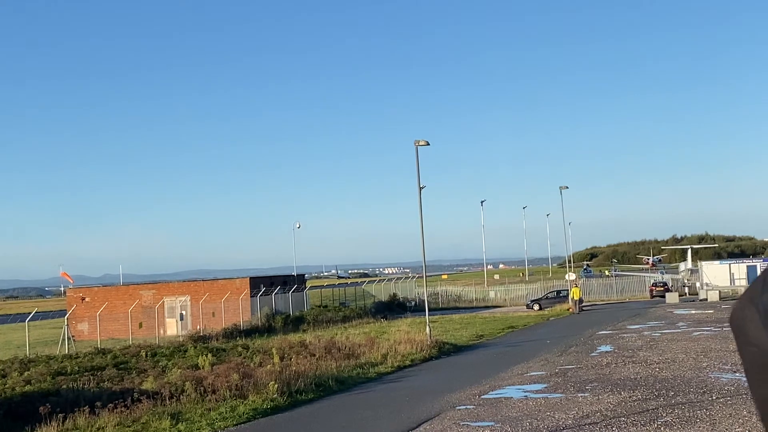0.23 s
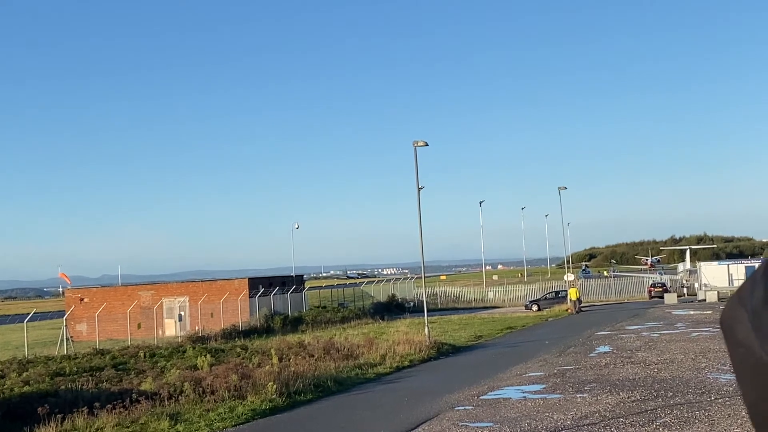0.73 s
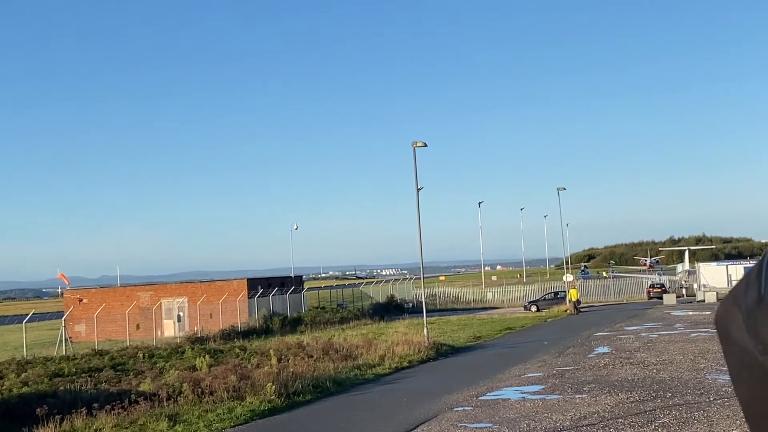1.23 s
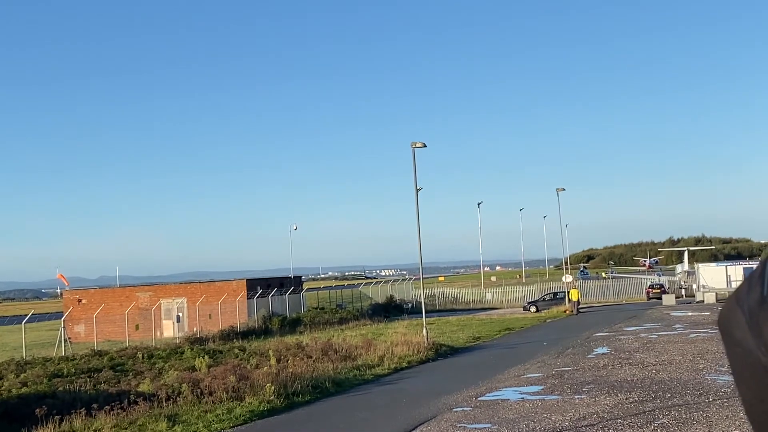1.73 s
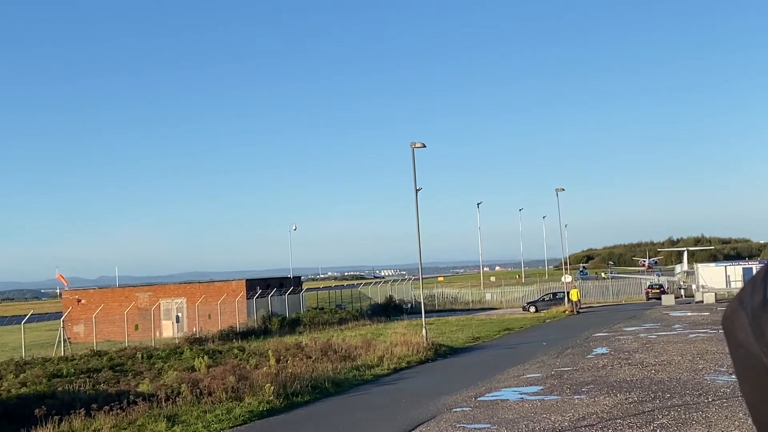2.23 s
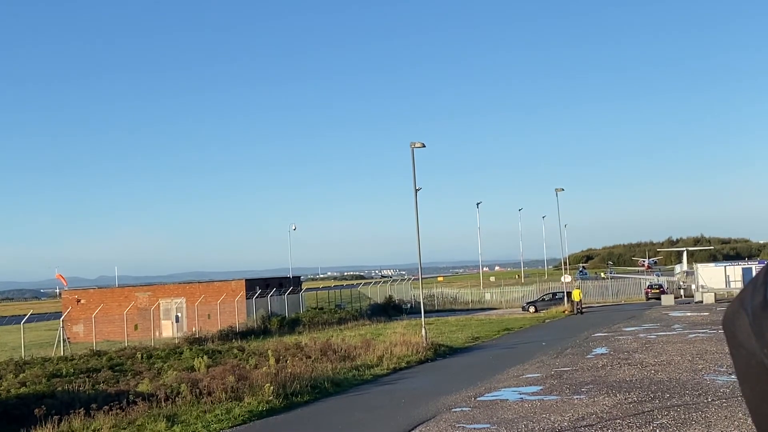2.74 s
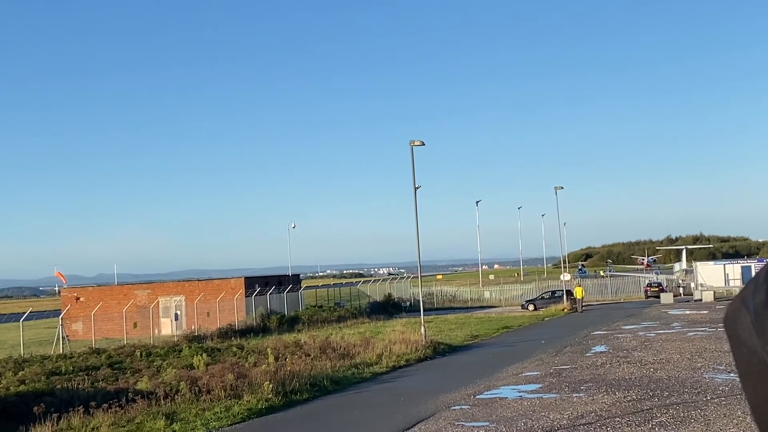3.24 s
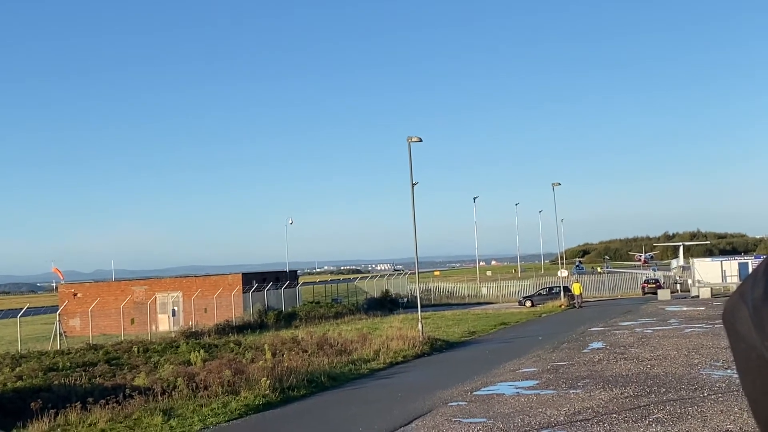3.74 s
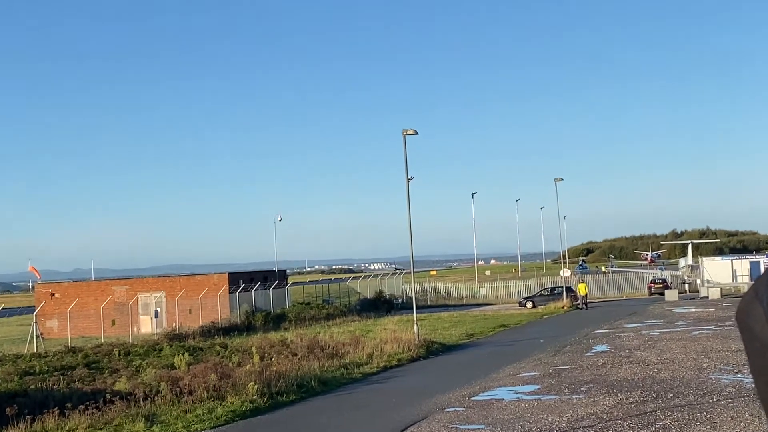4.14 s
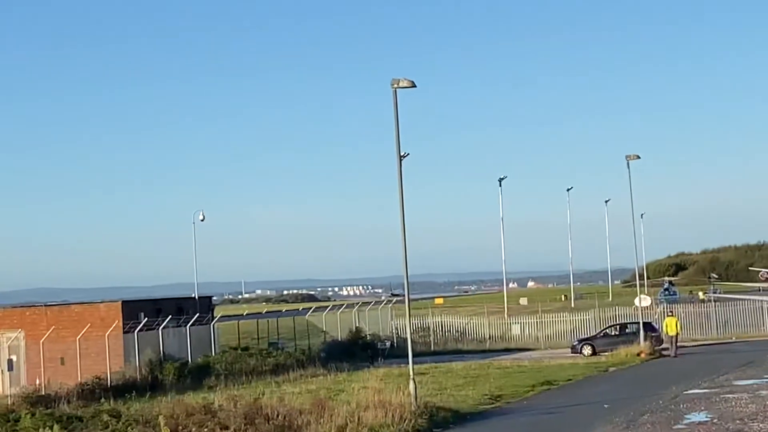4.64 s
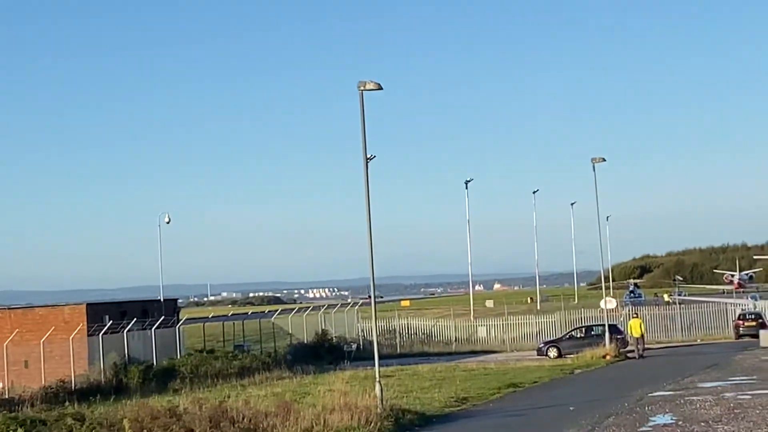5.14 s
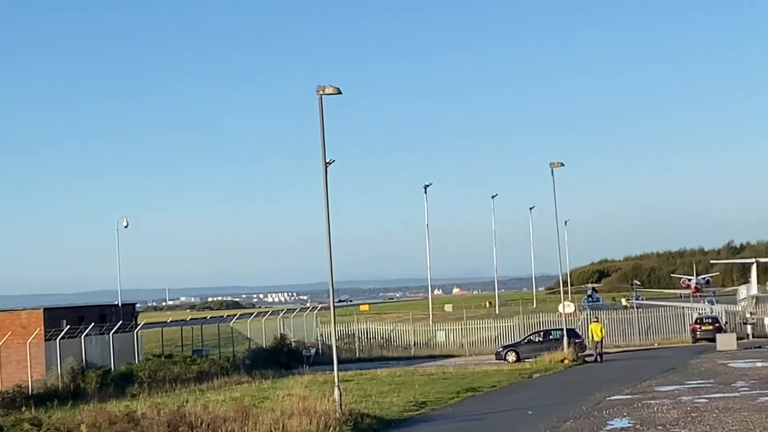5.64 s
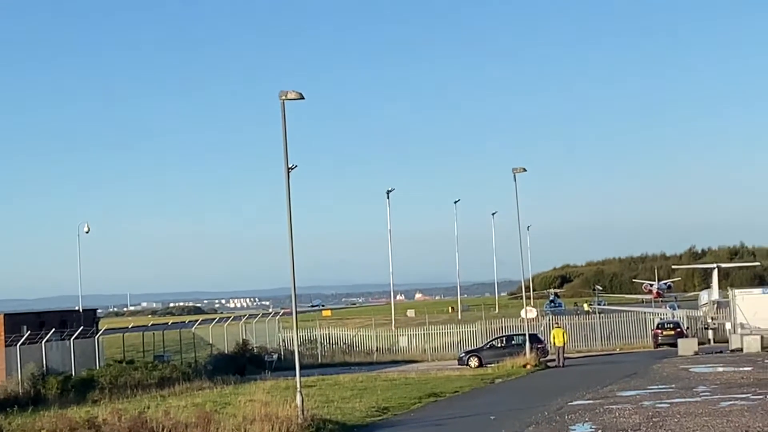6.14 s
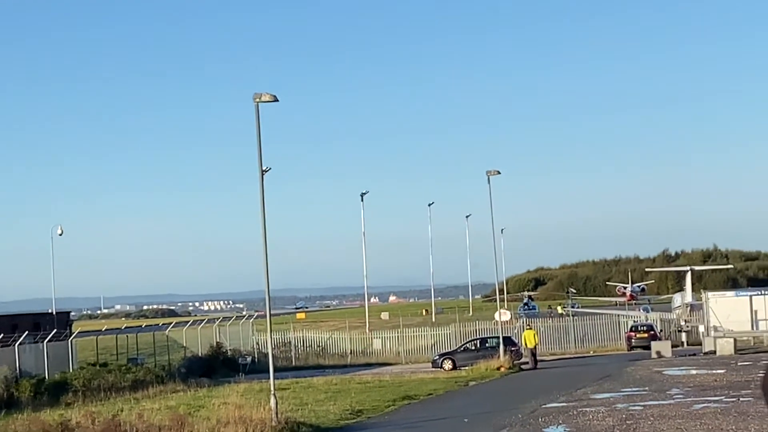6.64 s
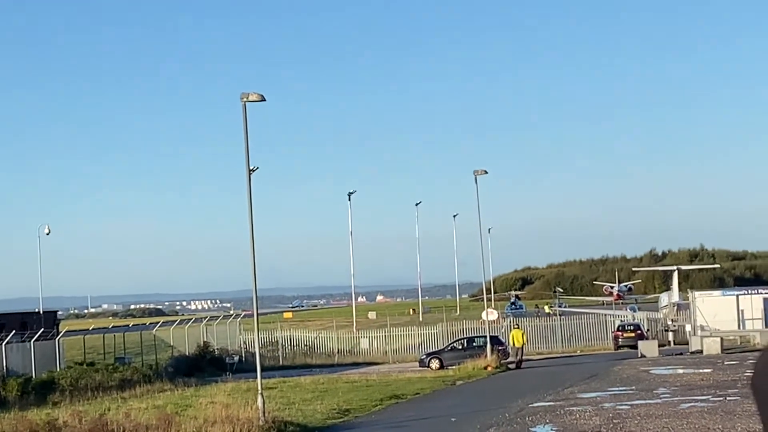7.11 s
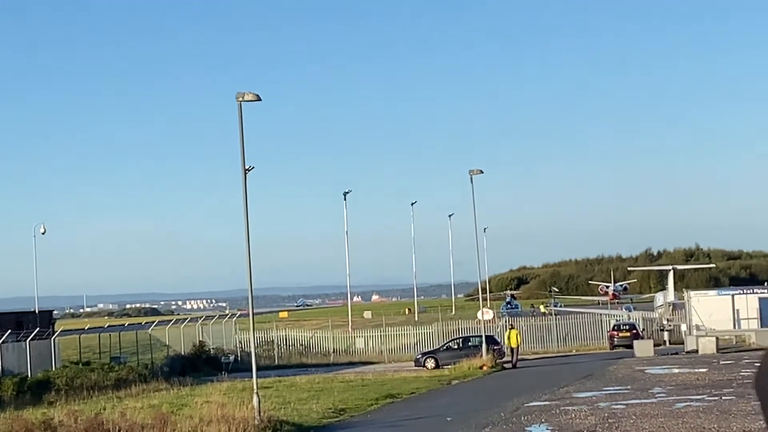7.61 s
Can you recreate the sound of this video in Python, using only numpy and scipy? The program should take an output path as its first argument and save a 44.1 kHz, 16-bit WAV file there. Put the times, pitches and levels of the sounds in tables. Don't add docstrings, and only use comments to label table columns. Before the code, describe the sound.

A continuous deep jet rumble fills the whole 7.9 seconds, already under way at the start, with slow booming pulses, strongest near 0.5 s and again around 1.8 and 4.7 s. Above it lies a broad turbulent roar, fullest around 2.8 s, then hazier and duller from about 4.5 s, fading slightly at the end. A faint blurred whine near 900 Hz sinks slowly. Small birds sing quietly on top: a rapid row of chips at 0.5-0.6 s, thin high whistles at 0.8-1.4, a louder cluster and warble at 1.5-2, stepped falling notes at 2.6-2.9, cheeps, swoops and steep falls at 4-5, distant buzzing falls near 5.8-6.1, and a last tumbling whistle at 7.7. Light echoes surround them. Soft low wind presses on the hand-held phone, with tiny finger ticks near 4, 4.25 and 7-7.3 s over faint hiss.

```python
import sys
import numpy as np
from scipy import signal
from scipy.fft import rfft, irfft, next_fast_len
from scipy.io import wavfile
from scipy.ndimage import uniform_filter1d

SR = 44100
rng = np.random.default_rng(int(sys.argv[2]) if len(sys.argv) > 2 else 0)


def amplitude_ratio(level_db):
    exponent = np.asarray(level_db, float) / 20
    return 10 ** exponent


def put_to_file(sound):
    columns = np.atleast_2d(sound).T
    safe = np.clip(columns, -1, 1)
    whole_steps = np.round(safe * 32767)
    wavfile.write(sys.argv[1], SR, whole_steps.astype(np.int16))


N = 347067
HZ = np.fft.rfftfreq(2048, 1 / SR)
T = np.arange(N // 512 + 5) * 512 / SR


def evened(x):
    return x / np.sqrt(np.mean(x ** 2) + 1e-20)


def read(points, hz):
    f, value = np.transpose(points)
    return np.interp(np.log(hz + 1), np.log(f + 1), value)


def control(table, index, t):
    rows = np.array(table)
    return np.interp(t, rows[:, 0], rows[:, index])


def add(mix, s, sound):
    part = mix[round(s * SR):][:len(sound)]
    part += sound[:len(part)]


def coloured(points, channels):
    size = next_fast_len(N)
    white = rfft(rng.standard_normal((channels, size)))
    gain = amplitude_ratio(read(points, np.fft.rfftfreq(size, 1 / SR)))
    return evened(irfft(white * gain, size)[:, :N])


def noise(field_db, same, patchy_db, side_db=0):
    a, b, c, d, patches = rng.standard_normal((len(T), len(HZ), 5)).T
    patches = evened(uniform_filter1d(uniform_filter1d(patches, 7, 0), 34, 1))
    same = np.clip(same, -1, 1)
    mid = np.sqrt((1 + same) / 2) * (a + 1j * b)
    side = np.sqrt((1 - same) / 2) * (c + 1j * d) * amplitude_ratio(side_db)
    z = np.array([mid + side, mid - side]) * amplitude_ratio(field_db + patchy_db * patches)
    return evened(signal.istft(z, nperseg=2048, noverlap=1536)[1][:, :N])


def air_pushes(rows, t60, rise_s, trim_db):
    out, t = np.zeros(N), np.arange(SR // 2) / SR
    for s, db, hz in rows:
        envelope = amplitude_ratio(db - 60 * t / t60 + trim_db) * (1 - np.exp(-t / rise_s))
        add(out, s, envelope * np.sin(2 * np.pi * hz * t))
    return out


# [f/Hz, density/dB per Hz]
RUMBLE_SPECTRUM = [(12, -42), (20, -20), (30, -8.5), (40, -1), (52, 0), (64, 4.5), (78, -2.5), (92, -7.5),
                   (125, -7.5), (160, -16.5), (195, -29.5), (260, -41), (440, -130)]
# [t/s, level/dB]
EDDY_SURGE = [(0.0, -26.5), (1.16, -26.5), (1.27, -38), (1.31, -27.5), (3.55, -29), (3.77, -25),
              (3.86, -28.5), (4.97, -25), (5.0, -34), (5.17, -25.5), (5.96, -34.5), (6.07, -24.5),
              (6.4, -31), (6.93, -31), (6.99, -25), (7.06, -31.5), (7.78, -32.5), (7.87, -38.5)]


def rumble():
    surge_db = control(EDDY_SURGE, index=1, t=np.arange(N) / SR)
    return coloured(RUMBLE_SPECTRUM, channels=1) * amplitude_ratio(0.58 + surge_db)


# [t/s, peak level/dB, f/Hz]
BOOMS_OF_EDDIES = [(0.118, -18.5, 75.6), (1.1, -16.5, 78.5), (1.91, -21, 56.5), (2.138, -16, 58.3),
                   (2.414, -25.5, 72.7), (3.011, -21, 61.7), (3.28, -20, 70.4), (3.925, -19, 68.3),
                   (4.391, -17, 65), (5.029, -24.5, 72.7), (5.264, -19, 60), (6.963, -19, 50.8),
                   (0.5, -13, 61.8),
    (1.76, -16.5, 58.4),
    (2.32, -18, 54.8),
    (2.8, -19, 58),
    (4.67, -15.5, 60),
]


def booms():
    return air_pushes(BOOMS_OF_EDDIES, t60=.35, rise_s=.03, trim_db=3.0)


ROAR_PARTS_HZ = [314, 520, 700, 1000, 1350, 2000]
# [f/Hz, density/dB per Hz]
EXHAUST_SPECTRUM = [(110, -35), (190, -7.5), (272, 0.5), (438, -10.5), (573, -8), (682, -13.5),
                    (840, -10.5), (911, -11), (977, -14), (1190, -15), (1380, -19), (1690, -19.5),
                    (2000, -21.5), (2300, -27.5), (3050, -36), (3450, -42.5), (3960, -55), (6710, -120)]
# [t/s, level/dB, weight of the low part/dB]
ROAR_SWELLS = [(0, -40.5, 5.5), (.6, -42.5, 3), (1.2, -44, 5), (1.8, -40.5, 4), (2.3, -39.5, 6.5),
               (2.8, -37, 5), (3.2, -38.5, 5), (3.6, -41, 1.5), (4.3, -42, 1.5), (5.1, -41, 1),
               (5.6, -40, -1), (6.1, -38.5, -0.5), (6.55, -39, -4), (7.0, -42, 0), (7.87, -45.5, -1.5)]
ROAR_LEVEL_SHARES = [0.93, 0.77, 0.29, 0.77, 1, 0.67]
ROAR_WEIGHT_SHARES = [1, .2, 0.012, 0.01, -.5, -0.065]
# [t/s, gain at 4 kHz/dB]
AIR_HAZE = [(0, 6), (.9, 4), (2.4, 6), (3.2, 7), (4.3, 1), (5.4, -4), (6.5, -7), (7.87, -4)]
# [f/Hz, likeness]
ROAR_LIKENESS = [(40, 0.8), (200, .98), (490, .95), (740, 0.93), (1130, 0.9), (1710, 0.96), (2600, .992),
                 (5000, 0.995)]
# [t/s, side level/dB]
ROAR_WIDTH = [(0, 7), (1.5, 3), (3, -3.5), (5, -1), (7.87, -2)]


def exhaust():
    level = amplitude_ratio(-36.5)
    comb_spacing_hz, first_hump_hz = 478, 463
    comb_depth_db = np.linspace(0.27, 2.2, len(T))
    colour_db = read(EXHAUST_SPECTRUM, HZ) + 7.5 * np.exp(-.5 * ((HZ - 4450) / 300) ** 2)
    comb = np.cos(2 * np.pi * (HZ - first_hump_hz) / comb_spacing_hz) * (HZ < 3200)
    comb_db = np.outer(comb, comb_depth_db)
    air_db = np.outer(np.clip(HZ / 4000, 0, 1) ** 4, control(AIR_HAZE, index=1, t=T))

    level_db, weight_db = (control(ROAR_SWELLS, k, T) for k in range(1, 3))
    swells_db = np.outer(ROAR_LEVEL_SHARES, level_db - level_db.mean())
    swells_db += np.outer(ROAR_WEIGHT_SHARES, weight_db - weight_db.mean())
    one_part_each = np.eye(len(ROAR_PARTS_HZ))
    shares = np.array([read(list(zip(ROAR_PARTS_HZ, row)), HZ) for row in one_part_each])

    field_db = colour_db[:, None] + comb_db + air_db + shares.T @ swells_db
    side_db = control(ROAR_WIDTH, index=1, t=T)
    return level * noise(field_db, read(ROAR_LIKENESS, HZ)[:, None], patchy_db=1.5, side_db=side_db)


# [t/s, f/Hz, level/dB]
FAN_TONE = [(0, 934, -46), (.9, 916, -44), (1.3, 914, -50), (2.0, 910, -52), (2.5, 907, -46),
            (3.1, 903, -47), (3.4, 902, -60), (4.05, 900, -58), (4.2, 899, -45), (4.7, 898, -44),
            (4.9, 897, -56), (5.2, 896, -44), (5.55, 895, -55), (6.0, 894, -46), (6.25, 893, -50),
            (6.55, 892, -41), (6.8, 891, -48), (7.2, 890, -50), (7.87, 888, -55)]


def whine(blur_hz=4, steady=3.2):
    t = np.arange(N) / SR
    turn = np.exp(2j * np.pi * np.cumsum(control(FAN_TONE, index=1, t=t)) / SR)
    keep = np.exp(-2 * np.pi * blur_hz / SR)
    a, b = signal.lfilter([1], [1, -2 * keep, keep ** 2], rng.standard_normal((2, N)))
    blurred = steady + evened(a) + 1j * evened(b)
    tone = turn * blurred * amplitude_ratio(control(FAN_TONE, index=2, t=t))
    port_lead = np.exp(1j * np.array([[.3], [-.3]]))
    return 0.25 * (tone * port_lead).real


# [from t/s, echo level/dB]
BIRD_ECHO = [(0, -11), (.8, -17), (1.45, -10.5), (2.9, -6), (3.2, -15), (3.7, -7), (4.18, -16), (4.52, -2),
             (4.93, -9), (5.5, -4), (7.53, -14)]


def birds():
    direct, sent = np.zeros((2, N))
    for s, hz, db in song():
        echo_db = [wet_db for since, wet_db in BIRD_ECHO if since <= s[0]][-1]
        sound = whistle(s, hz, db, flutter_db=np.clip(4.2 + .24 * echo_db, 1.3, 4))
        add(direct, s[0], sound)
        add(sent, s[0], amplitude_ratio(echo_db) * sound)
    pan = amplitude_ratio(.15 * np.array([[1], [-1]]))
    return ports(direct * pan + yard(sent))


def song():
    return long_whistles() + shaped_chips() + slurs() + trills() + buzzes()


# [t/s, f/Hz, level/dB]
HIGH_WHISTLE = [(.83, 7290, -85), (.87, 7520, -73), (.93, 7780, -69), (1.01, 7570, -62), (1.078, 7580, -69)]
HIGHER_WHISTLE = [(1.088, 7680, -69), (1.195, 7840, -59), (1.22, 7990, -62), (1.238, 7850, -61),
                  (1.3, 7930, -64), (1.39, 7920, -69), (1.406, 7850, -76)]
WARBLE_WHISTLE = [(1.76, 4480, -77), (1.767, 3860, -52), (1.81, 4120, -49), (1.825, 4370, -44),
                  (1.85, 4310, -45), (1.875, 3410, -50), (1.9, 3370, -52), (1.945, 3500, -50),
                  (1.987, 3350, -61)]
THIN_WHISTLE = [(3.25, 7340, -91), (3.3, 8050, -89), (3.345, 8450, -85), (3.39, 8780, -93),
                (3.44, 8800, -91), (3.5, 8650, -89), (3.6, 8480, -90), (3.7, 8280, -92)]
SWOOP_WHISTLE = [(4.203, 6560, -90), (4.215, 7010, -72), (4.235, 6250, -58), (4.255, 6070, -54),
                 (4.285, 6370, -54), (4.32, 6420, -57), (4.34, 6260, -71)]
CLIMB_WHISTLE = [(4.399, 3700, -76), (4.407, 3580, -59), (4.425, 3880, -61), (4.46, 3880, -52),
                 (4.475, 4200, -61), (4.487, 4090, -72.5)]
CREST_WHISTLE = [(4.54, 5000, -85), (4.56, 5830, -71), (4.595, 6270, -66), (4.625, 6200, -64),
                 (4.64, 5750, -68), (4.665, 5050, -74)]
TUMBLE_WHISTLE = [(7.732, 8440, -92), (7.742, 7750, -71), (7.757, 7720, -68), (7.769, 7980, -72),
                  (7.785, 7450, -78), (7.81, 7060, -69), (7.835, 6810, -70), (7.855, 5650, -76),
                  (7.869, 4550, -72)]


def long_whistles():
    contours = (HIGH_WHISTLE, HIGHER_WHISTLE, WARBLE_WHISTLE, THIN_WHISTLE,
                SWOOP_WHISTLE, CLIMB_WHISTLE, CREST_WHISTLE, TUMBLE_WHISTLE)
    return [np.transpose(contour) for contour in contours]


# [share of length, pitch ratio, level/dB]
ARCH_SHAPE = [(0, .92, -4), (.5, 1, 0), (1, .93, -4)]
DIP_SHAPE = [(0, 1.15, -14), (.2, 1.03, -2), (.6, .985, 0), (1, 1.06, -8)]
STAIR_SHAPE = [(0, 1.17, -14), (.28, .98, -2), (.55, 1.01, 0), (.8, .96, 0), (1, .86, -9)]
PLUNGE_SHAPE = [(0, 1.32, -7), (.28, 1.25, -3), (.55, 1.07, -1.5), (.75, 1.0, -4), (1, 0.89, -6.5)]
RISE_SHAPE = [(0, .9, -7), (.55, .985, 0), (1, 1, -3)]
LEAN_SHAPE = [(0, .9, -6), (.18, 1, 0), (.5, .97, -3), (.75, .92, 0), (1, .84, -8)]
SHELF_SHAPE = [(0, 1, -3), (.35, 1, 0), (.75, .975, 1), (1, .96, -3)]
# [t/s, length/s, top f/Hz, level/dB]
ARCHED_CHIPS = [
    (.383, .03, 4750, -71),
    (.635, .016, 4810, -72),
    (2.772, .016, 3520, -57),
    (5.762, .012, 5300, -80),
    (1.522, .012, 4300, -56),
]
# [t/s, length/s, bottom f/Hz, level/dB]
HOOKED_NOTES = [
    (1.482, .025, 4080, -49),
    (1.507, .015, 3900, -55),
    (1.624, .028, 3680, -50),
    (1.676, .032, 3720, -50),
    (3.86, .025, 3900, -71),
    (7.616, .018, 4300, -75),
]
# [t/s, length/s, shelf f/Hz, level/dB]
STAIR_NOTES = [
    (2.575, .061, 4060, -60),
    (2.672, .062, 3270, -59),
    (7.548, .06, 7600, -74),
]
# [t/s, length/s, landing f/Hz, level/dB]
STEEP_FALLS = [
    (4.703, .046, 4330, -63.5),
    (4.773, 0.061, 4380, -65.5),
    (4.874, .058, 4080, -61.5),
]
# [t/s, length/s, top f/Hz, level/dB]
RISING_CHIPS = [
    (.507, .013, 5550, -72),
    (.527, .014, 5650, -73),
    (.545, .015, 5550, -71),
    (.565, .014, 5550, -72),
    (.581, .014, 5550, -71),
    (.597, .015, 5400, -72),
    (.614, .008, 4900, -70),
    (1.499, .009, 4650, -58),
]
# [t/s, length/s, top f/Hz, level/dB]
LEANING_NOTES = [
    (.245, .044, 5330, -68),
    (5.365, .035, 4050, -73),
]
# [t/s, length/s, f/Hz, level/dB]
SAGGING_NOTES = [
    (1.537, .063, 3880, -50),
    (.681, .024, 6120, -75),
    (1.572, .03, 3520, -60),
    (.545, .06, 4250, -81),
    (2.995, .03, 3850, -70),
    (3.845, .045, 4080, -73),
    (3.885, .04, 4900, -90),
    (3.783, .011, 4680, -74),
    (3.785, .011, 4120, -72),
    (3.963, .02, 4950, -88),
]


def shaped_chips():
    families = [(ARCH_SHAPE, ARCHED_CHIPS), (DIP_SHAPE, HOOKED_NOTES), (STAIR_SHAPE, STAIR_NOTES),
                (PLUNGE_SHAPE, STEEP_FALLS), (RISE_SHAPE, RISING_CHIPS), (LEAN_SHAPE, LEANING_NOTES),
                (SHELF_SHAPE, SAGGING_NOTES)]
    return [shaped(shape, *row) for shape, rows in families for row in rows]


def shaped(shape, s, length, hz, db):
    share, ratio, rel_db = np.transpose(shape)
    return s + length * share, hz * ratio, db + rel_db


# [t/s, length/s, first f/Hz, last f/Hz,
# level/dB]
BRIEF_SLURS = [
    (.603, .03, 6400, 5200, -77),
    (.623, .027, 7100, 6450, -80),
    (.655, .013, 6450, 6000, -75),
    (1.511, .014, 4250, 3600, -57),
    (1.621, .009, 4850, 4050, -60),
    (2.933, .047, 4150, 3250, -62),
               (3.848, .012, 3700, 3050, -68), (3.968, .01, 3900, 3250, -68),
                 (4.013, .01, 4750, 4150, -76), (5.7, .015, 3950, 3600, -76),
                 (3.775, .012, 4300, 3600, -66), (3.785, .045, 4700, 4500, -77),
                 (3.9, .015, 4200, 3200, -62), (3.922, .016, 3900, 4150, -68),
                 (3.972, .02, 4200, 3450, -65), (6.193, .01, 5050, 4450, -77),
                 (6.22, .012, 4500, 5100, -84), (6.303, .014, 5050, 4550, -84),
                 (6.325, .035, 7000, 6950, -91), (6.385, .03, 7150, 6900, -86),
                 (6.705, .08, 4400, 4000, -81), (6.955, .02, 3900, 4000, -72),
                 (7.52, .025, 5650, 5400, -88), (7.553, .01, 4800, 4300, -81),
                 (7.572, .008, 4750, 4350, -79)]
CHEEP_TIMES = [
    4.038,
    4.122,
]
# [after t/s, length/s, first f/Hz, last f/Hz, level/dB]
CHEEP_SLURS = [
    (0, .009, 5100, 4300, -62),
    (.0105, .006, 5150, 4200, -69),
    (.012, .01, 3800, 3050, -64),
    (.02, .012, 3750, 3500, -66),
]


def slurs():
    notes = [slur(*row) for row in BRIEF_SLURS]
    notes += [slur(s + after, *rest) for s in CHEEP_TIMES for after, *rest in CHEEP_SLURS]
    return notes


def slur(s, length, first_hz, last_hz, db):
    middle_hz = (1 - .04) * (first_hz + last_hz) / 2
    pitches = [first_hz, middle_hz, last_hz]
    return s + length * np.array([0, .5, 1]), pitches, db - 5 * np.array([1, 0, 1])


# [t/s, last t/s, rate/per s, top f/Hz, level/dB]
TRILL_ROWS = [
    (4.937, 5.04, 50, 3560, -64),
]


def trills(duty=.62):
    notes = []
    for s, last, rate, hz, db in TRILL_ROWS:
        notes += [shaped(ARCH_SHAPE, at, duty / rate, hz, db) for at in np.arange(s, last, 1 / rate)]
    return notes


# [t/s, length/s, first f/Hz, last f/Hz, level/dB]
BUZZING_FALLS = [
    (5.775, .11, 4750, 3300, -77),
    (5.972, .05, 4150, 3550, -75),
    (6.02, .125, 5150, 3750, -73),
]


def buzzes(rate_per_s=130, fall_hz=250):
    notes = []
    for s, length, first_hz, last_hz, db in BUZZING_FALLS:
        for u in np.arange(0, 1, 1 / (rate_per_s * length)):
            hz = first_hz + u * (last_hz - first_hz)
            notes.append(slur(s + u * length, 1 / rate_per_s, hz + fall_hz, hz - fall_hz / 2, db))
    return notes


def whistle(s, hz, level_db, flutter_db):
    t = np.arange(s[0], s[-1], 1 / SR)
    random_walks = rng.standard_normal((2, len(t) + 2000))
    flutter, waver = uniform_filter1d(uniform_filter1d(random_walks, 90), 90)
    pitch = uniform_filter1d(np.interp(t, s, hz), 130, mode="nearest")
    pitch = pitch + 15 * flutter_db * evened(waver)[:len(t)]
    turns = 2 * np.pi * np.cumsum(pitch) / SR
    second_harmonic = amplitude_ratio(-60 + 24 * np.log2(pitch / 3500)) * np.sin(2 * turns)
    tone = np.sin(turns) + second_harmonic
    edge = np.clip(np.minimum(t - t[0], t[-1] - t) / .0025, 0, 1)
    level = amplitude_ratio(np.interp(t, s, level_db) + flutter_db * evened(flutter)[:len(t)])
    return np.sqrt(2) * tone * edge * level


def yard(x, t60=0.99, beyond_db=-10, twigs_db=8):
    wall_s = .125
    slap_s, slap_db, slap_smear_s = .24, 11, .025
    post_s, post_share = .011, .5
    taps = np.zeros((2, SR // 2))
    at = np.arange(100, SR // 2 - 20, 20) + rng.integers(0, 20, (2, (SR // 2 - 101) // 20))
    np.put_along_axis(taps, at, rng.choice([-1., 1.], at.shape), 1)
    taps[1] = .96 * taps[0] + .28 * taps[1]
    t = np.arange(SR // 2) / SR
    decay_db = -60 * t / t60 + beyond_db / (1 + np.exp((wall_s - t) / .012))
    near_db = twigs_db * np.exp(-t / 0.0047)
    late_db = slap_db * np.exp(-.5 * ((t - slap_s) / slap_smear_s) ** 2)
    tail = taps * amplitude_ratio(decay_db + near_db + late_db)
    tail[:, round(post_s * SR)] += post_share * np.linalg.norm(tail[0])
    return signal.fftconvolve(x[None], tail / np.linalg.norm(tail[0]), axes=1)[:, :N]


# [f/Hz, left lead/rad]
PORT_LEAD = [(3400, .46), (4300, .16), (6200, -.08), (7000, -.5), (7600, -.9), (7900, -1.26), (8500, -2.4)]


def ports(x):
    size = next_fast_len(N)
    lean = np.tan(read(PORT_LEAD, np.fft.rfftfreq(size, 1 / SR)) / 2)
    return irfft(rfft(x, size) * (1 + 1j * lean * np.array([[1], [-1]])), size)[:, :N]


# [f/Hz, density/dB per Hz]
WIND_SPECTRUM = [(15, -36), (30, -14), (45, -5.5), (62, 2), (100, -1.5), (150, -1), (200, -13),
                 (300, -17.5), (450, -40.5), (1300, -140)]
# [t/s, level/dB]
WIND_GUSTS = [(0, -26.5), (1.4, -26), (2.4, -29), (3.3, -34), (3.6, -30), (4.199, -31), (5.3, -22.5),
              (6.5, -29), (7.3, -25), (7.87, -32)]


def wind(trim_db=-10.0, lumpy_db=1.0):
    lumps = rng.standard_normal((2, N))
    lumps = evened(uniform_filter1d(uniform_filter1d(lumps, 1800), 1800))
    level_db = control(WIND_GUSTS, index=1, t=np.arange(N) / SR) + trim_db
    return evened(coloured(WIND_SPECTRUM, channels=2) * amplitude_ratio(lumpy_db * lumps)) * amplitude_ratio(level_db)


# [t/s, peak level/dB, f/Hz]
WIND_BUMPS = [
    (0.322, -29, 186),
    (0.981, -29, 165),
    (3.461, -29.5, 158),
    (7.228, -28, 169),
    (7.423, -27.5, 137),
]


def bumps():
    return air_pushes(WIND_BUMPS, t60=0.077, rise_s=0.0055, trim_db=14.0)


# [t/s, peak level/dB]
FINGER_TICKS = [(3.9589, -68), (4.0033, -80), (4.2527, -60), (4.2535, -62), (6.8024, -70), (6.806, -74),
                (7.0464, -66), (7.2255, -69), (7.2701, -74), (7.316, -72), (7.3238, -59), (7.3258, -61),
                (7.347, -70), (7.856, -74)]


def ticks(t60=.008):
    out, t = np.zeros(N), np.arange(300) / SR
    for (s, db), grit in zip(FINGER_TICKS, rng.standard_normal((len(FINGER_TICKS), 300))):
        add(out, s, amplitude_ratio(db + 3 - 60 * t / t60) * grit)
    band = signal.butter(2, [2800, 8500], "band", fs=SR, output="sos")
    return signal.sosfilt(band, out) * amplitude_ratio(np.array([[1.5], [-1.5]]))


# [f/Hz, density/dB per Hz]
HISS_SPECTRUM = [(4000, -140), (4600, -126), (5500, -126), (6500, -127), (8100, -130), (8500, -143),
                 (9300, -138), (9700, -133), (10500, -132), (12400, -132), (12650, -139), (16000, -141)]
# [f/Hz, likeness]
HISS_LIKENESS = [(7300, .995), (8300, .1), (9000, -.5), (10000, .1), (10600, .75), (12000, .75),
                 (13000, -.3)]


def microphone():
    colour_db = read(HISS_SPECTRUM, HZ) + 13.0 * np.exp(-.5 * ((HZ - 12050) / 130) ** 2)
    level = np.sqrt(np.sum(amplitude_ratio(colour_db) ** 2) * HZ[1])
    return level * noise(colour_db[:, None] + 0 * T, read(HISS_LIKENESS, HZ)[:, None], patchy_db=1.5)


def scene():
    jet = rumble() + booms() + exhaust() + whine()
    return jet + birds() + wind() + bumps() + ticks()


def top_cut(x):
    return signal.sosfilt(signal.butter(12, 15900, fs=SR, output="sos"), x)


def record(dry):
    edge = np.clip(np.arange(N)[::-1] / (.004 * SR), 0, 1)
    mix = (dry + microphone()) * np.sin(np.pi / 2 * edge) ** 2
    return top_cut(mix)


dry = scene()
out = record(dry)
put_to_file(out)
```